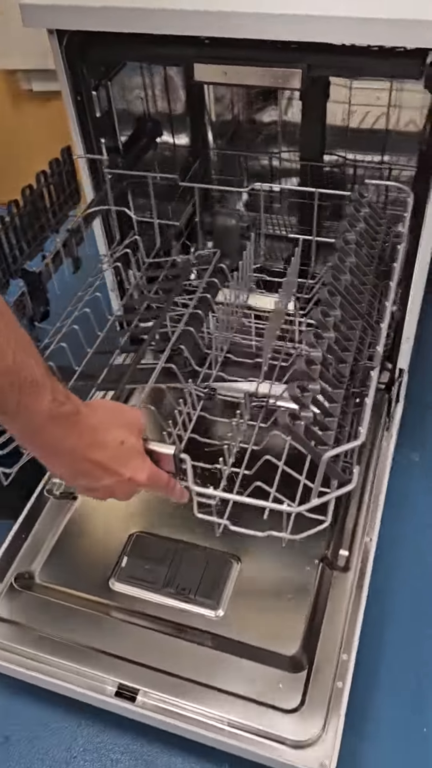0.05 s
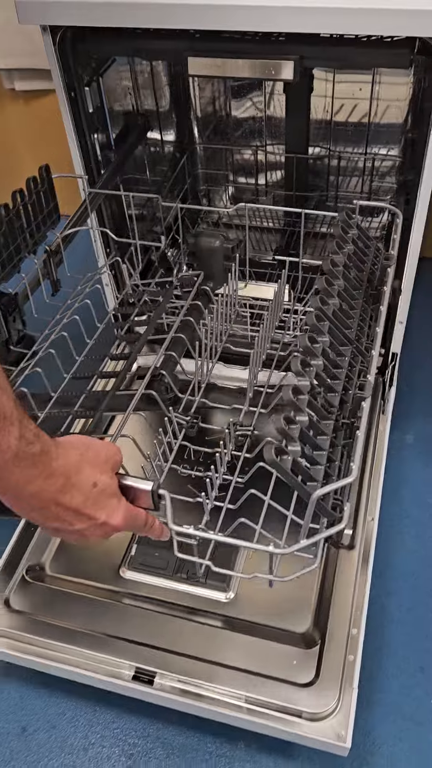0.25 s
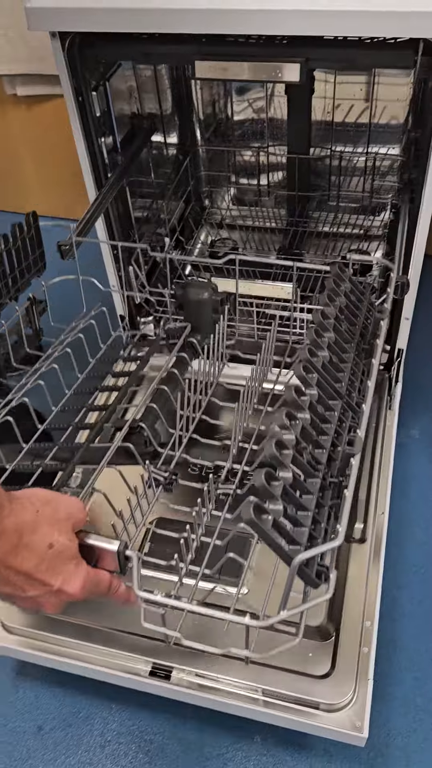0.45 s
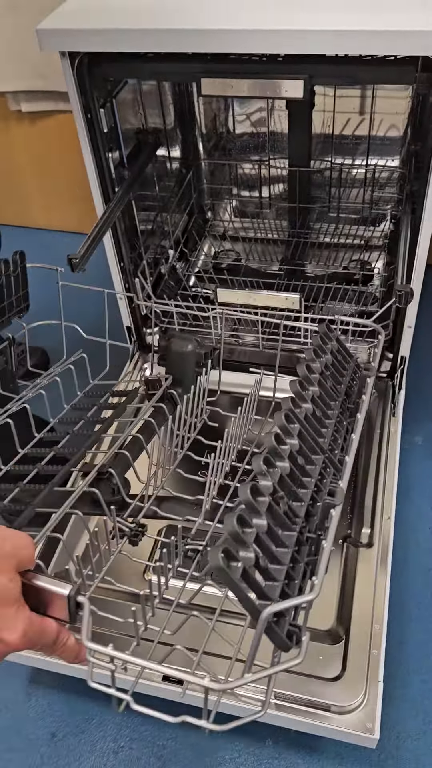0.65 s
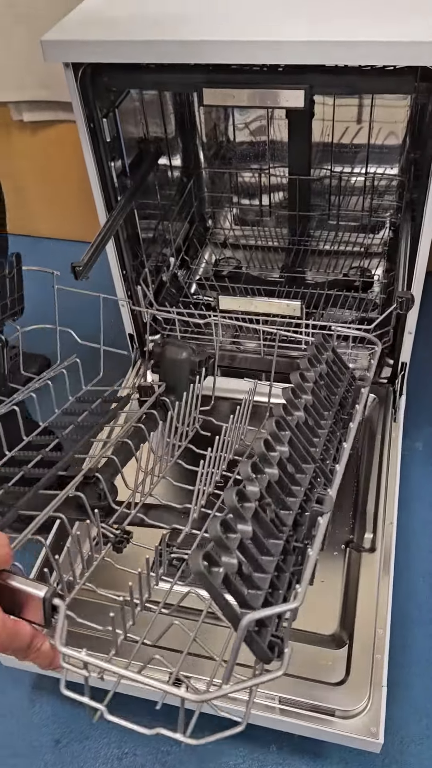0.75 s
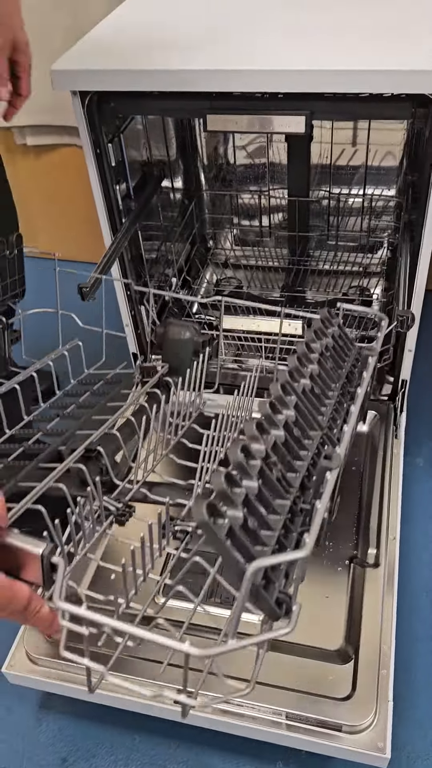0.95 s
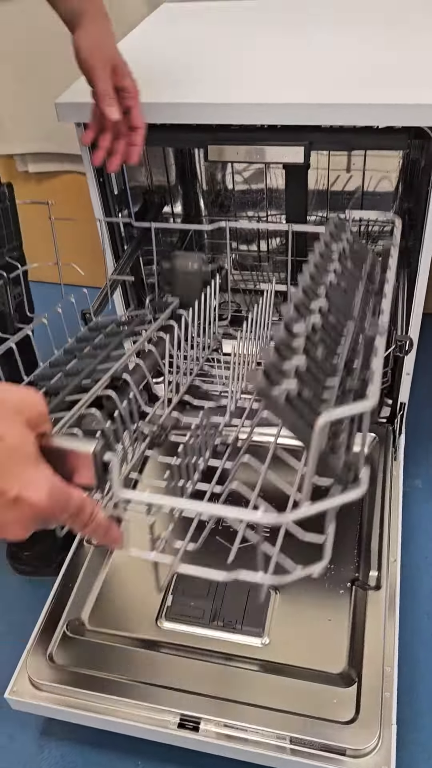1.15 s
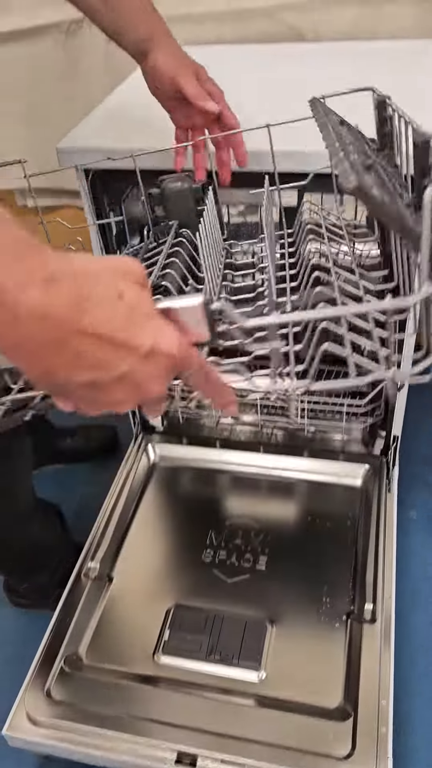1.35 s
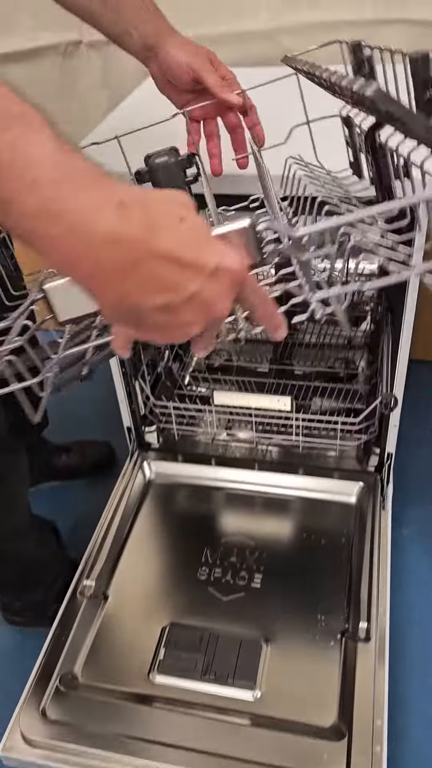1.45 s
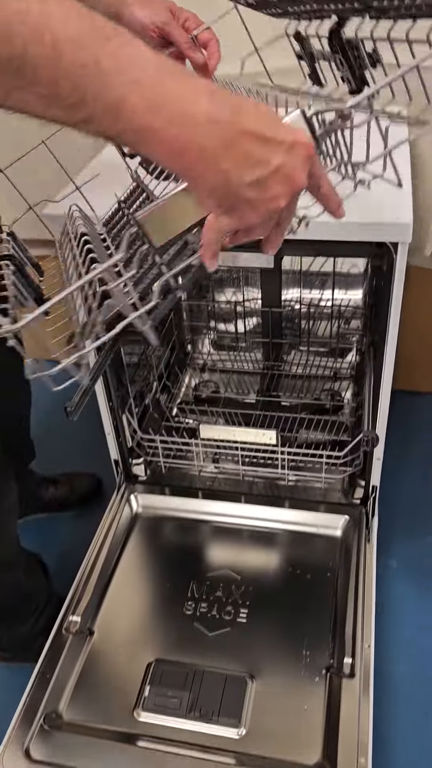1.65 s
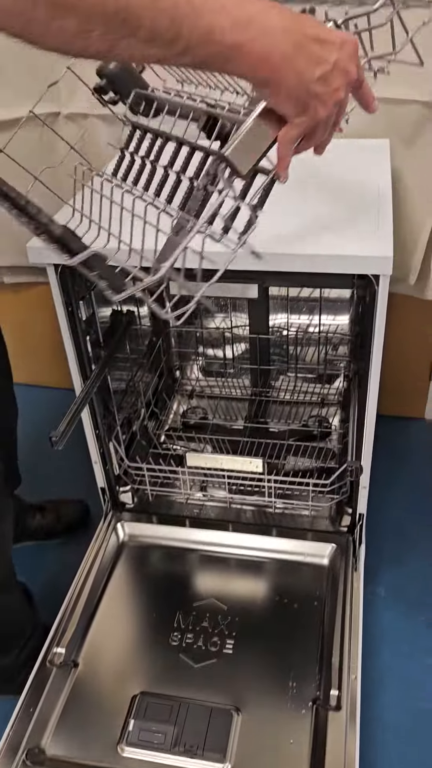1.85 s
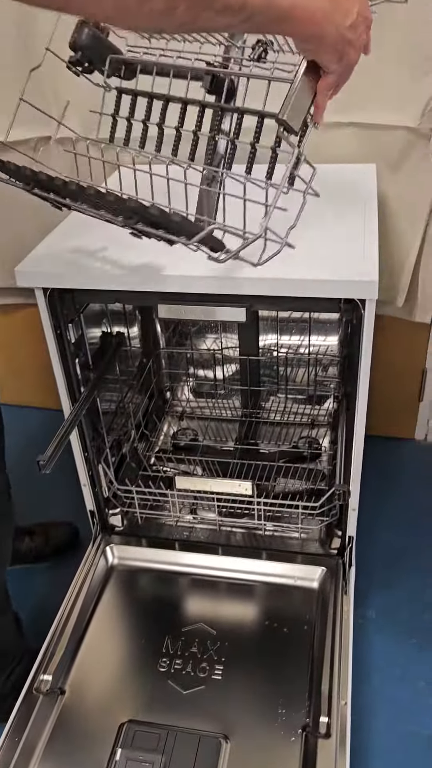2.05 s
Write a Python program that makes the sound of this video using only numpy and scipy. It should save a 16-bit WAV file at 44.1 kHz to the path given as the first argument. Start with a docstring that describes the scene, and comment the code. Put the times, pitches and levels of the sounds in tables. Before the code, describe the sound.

Metal dishwasher rack clattering at the end of its rails, then a snap and soft bump.

```python
"""A small, quiet room with low ventilation noise, a stereo microphone pair near a dishwasher.
The wire rack rolls out on its rails and crashes into the end stops, ringing its wires and the steel tub.
A catch snaps on the right; the rack scrapes off the rails and bumps the cabinet as it is lifted away.
It rubs lightly while carried, and a loose fitting ticks faintly, close to the right microphone."""
import sys
import numpy as np
from scipy import signal
from scipy.fft import rfft, irfft, next_fast_len
from scipy.io import wavfile

SR = 44100
rng = np.random.default_rng(int(sys.argv[2]) if len(sys.argv) > 2 else 0)


def put_to_file(sound):
    """Save the sound as 16-bit audio at rate SR, in the file named by the first command-line argument."""
    columns = np.atleast_2d(sound).T  # one column per channel
    safe = np.clip(columns, -1, 1)
    whole_steps = np.round(safe * 32767)
    wavfile.write(sys.argv[1], SR, whole_steps.astype(np.int16))


N = 92610
T = np.arange(N) / SR

# rack hitting the end stops: start_s, wire_db, tub_db, left_over_right_db
STOP_HITS = [(0.1892, -38, -46.5, -5), (0.1905, -25.5, -34.5, 0), (0.1962, -22.5, -32.5, -3.5),
             (0.203, -26.5, -34, -8), (0.2104, -15.5, -43.5, -3), (.2155, -23, -43.5, -3),
             (0.2207, -10.5, -41.5, 1.5), (.226, -12.5, -45.5, -3.5), (.2355, -15.5, -36, -3),
             (0.254, -41, -39, -3.5)]
# spectrum of the crowded wire modes: frequency_hz, level_db
CLASH_SPECTRUM = [(400, -18.5), (800, -21.5), (1600, -20), (2500, -13.5), (3200, -8.5), (4100, -2),
                  (5400, 0), (7300, -1), (9000, -9.5), (12000, -14), (15800, -19.5)]
# clear wire modes: pitch_hz, level_db
WIRE_MODES = [(2734, -31), (3130, -24), (3597, -25.5), (3766, -29), (4048, -22.5), (4141, -22),
              (4760, -25.5), (4936, -17), (5056, -19), (5194, -22.5), (5256, -14.5), (5441, -13.5),
              (5640, -26.5), (6072, -23.5), (6118, -25), (6534, -24), (6880, -26.5), (7060, -24.5),
              (7255, -16), (7804, -23.5), (9152, -25), (12300, -27)]
# steel tub modes: pitch_hz, level_db, t60_s
TUB_MODES = [(88, -15.5, .25), (127.8, -6.5, .35), (175.3, -16, .25), (244, -8, .25), (335, -13, 0.28),
             (392.5, -1.5, .15), (594.6, -4, 0.171), (670.3, -4, .15), (1298, -13.5, .15)]
# dull panel flex: frequency_hz, level_db
PANEL_SPECTRUM = [(25, -28.5), (70, -6.5), (150, -6), (400, -5.5), (800, -10.5), (1500, -13.5),
                  (4000, -44.5)]

# plastic catch and its rebounds: start_s, level_db
SNAP_HITS = [(0.753, -32), (.757, -41), (0.766, -49.5)]
# plastic snap: frequency_hz, level_db
SNAP_SPECTRUM = [(180, -18), (400, -5), (800, -19), (1200, 0.5), (2000, 3.5), (3000, 1.5), (4100, -6),
                 (5200, -6), (7500, -12), (10000, -22), (15800, -30)]
# rail modes: pitch_hz, level_db, t60_s
RAIL_MODES = [(252, -15.5, 0.2), (607, -23.5, 0.44), (786, -18.5, 0.32), (1144, -14.5, 0.15),
              (1556, -14.5, 0.16), (2146, -22, 0.24), (2256, -30, 0.1)]

# soft bumps on the cabinet: start_s, level_db
BUMP_HITS = [(1.2791, -35.5), (1.313, -46.5)]
# thud of a bump: frequency_hz, level_db
BUMP_SPECTRUM = [(25, -22), (65, 6), (140, -1), (220, 3.5), (380, -1.5), (600, -8), (900, -24), (1700, -39),
                 (2250, -24.5), (2800, -32), (3400, -42), (6000, -48), (12000, -67)]
# cabinet modes: pitch_hz, level_db, t60_s
CABINET_MODES = [(67.5, -4, 0.13), (127.85, -7.5, .18), (216.7, -16, 0.11), (334, -1.5, 0.14),
                 (558, -16.5, 0.24), (2240, -41, 0.057), (2750, -37, 0.079)]

# rack rolling out: time_s, rumble_db, rattle_db
ROLL_LEVELS = [(0, -41, -55.5), (.04, -58, -59), (.08, -53.5, -59), (.1, -58.5, -54), (.15, -52.5, -60.5),
               (.19, -56.5, -57.5), (.36, -60, -61.5), (.47, -69, -66), (.57, -63.5, -64.5),
               (.61, -91, -76.5), (.7, -79, -90)]
# wheel rumble: frequency_hz, level_db
RUMBLE_SPECTRUM = [(25, -31.5), (70, -17.5), (105, 2), (150, -11), (210, -4.5), (350, -15.5), (600, -20),
                   (1200, -38.5), (3000, -59)]
# shaken wires: frequency_hz, level_db
RATTLE_SPECTRUM = [(530, -44), (900, -9), (1210, -24.5), (1450, -8), (1960, -26), (2110, -15.5),
                   (3570, -9.5), (4280, -3), (7980, -13.5), (12900, -20), (15800, -29.5)]

# rack sliding off the rails: time_s, body_db, hiss_db
SLIDE_LEVELS = [(.69, -95.5, -100), (.715, -66.5, -78), (.745, -71.5, -84.5), (.775, -59.5, -69.5),
                (.81, -58.5, -64), (.84, -59, -68), (.87, -70.5, -78.5), (.93, -88, -87), (1, -110, -110)]
# body of the scrape: frequency_hz, level_db
SCRAPE_SPECTRUM = [(150, -13.5), (270, -1.5), (400, -5), (570, 2), (800, -4.5), (1000, -10.5), (1180, -6.5),
                   (1400, -13), (2100, -9), (3200, -10), (4200, -6), (5300, -11.5), (8000, -20),
                   (11000, -45.5)]
# hiss of the scrape: frequency_hz, level_db
HISS_SPECTRUM = [(4000, -23.5), (8000, -0.5), (12500, -0.5), (15800, -11.5)]

# loose fitting in the lifted rack: start_s, level_db
TICK_HITS = [(1.8315, -53)]
# tick of the fitting: frequency_hz, level_db
TICK_SPECTRUM = [(800, -20.5), (2000, -13), (3300, -34), (4300, -6), (5000, 0.5), (5700, -11), (7000, -8),
                 (9000, -31), (15000, -36.5)]
# light rubs of the rack: peak_s, half_width_s, level_db
RUB_STROKES = [(1.47, 0.018, -66.5), (2.047, .015, -82)]
# rubbing noise: frequency_hz, level_db
RUB_SPECTRUM = [(700, -22), (980, -3), (1090, 19), (1220, -13), (1500, -17), (3300, -11), (4500, 2),
                (6300, -10), (8400, 2), (10000, -23), (15000, -22.5)]

# ventilation and microphone hiss: frequency_hz, level_db
ROOM_TONE_SPECTRUM = [(15, -33.5), (25, -2), (110, -6), (144, 0), (205, -4), (248, -5), (333, -4),
                      (371, -11), (425, -13.5), (572, -14), (620, -18), (955, -22), (1870, -27.5),
                      (5820, -35), (8490, -29.5), (9720, -45), (15800, -44)]
# likeness of the sound at the two microphones: frequency_hz, correlation
MIC_CORRELATION = [(60, 0.89), (170, 1), (350, .72), (700, 0.5), (1400, -0.059), (3000, 0.16),
                   (6000, 0.083), (15000, .1)]
# decay of the room: frequency_hz, t60_s
ROOM_DECAY = [(100, 0.64), (300, 0.42), (700, 0.48), (2000, 0.34), (5000, .29), (13000, 0.27)]

LOW_CUT_HZ, TOP_HZ = 20, 16000


def rack_crash():
    """Each contact with the stops clashes the wires, leaves them chattering and knocks the tub."""
    hz = np.arange(110, TOP_HZ, 110)
    ripple_db = 3.5 * rng.standard_normal(len(hz))
    crowded_modes = np.column_stack([hz, along(CLASH_SPECTRUM, hz) + ripple_db])
    impacts = np.zeros((2, N))
    for start_s, wire_db, tub_db, side_db in STOP_HITS:
        strike = blow(start_s, t60_s=0.094, attack_s=0.0004)
        chatter = amp(-30) * blow(start_s, t60_s=0.43, attack_s=0.01)
        clash = noise(crowded_modes) * grains(per_s=2600, life_s=0.00071)
        impacts += amp(wire_db) * pan(side_db) * clash * (strike + chatter)
        impacts += amp(tub_db - 2) * noise(PANEL_SPECTRUM) * blow(start_s, t60_s=0.15, attack_s=0.00077)
    wire_hits, tub_hits = [(s, db) for s, db, _, _ in STOP_HITS], [(s, db) for s, _, db, _ in STOP_HITS]
    wire_t60_s = 0.11
    wires = ring([(pitch_hz, db, wire_t60_s) for pitch_hz, db in WIRE_MODES], wire_hits, width_hz=10)
    tub = ring(TUB_MODES, tub_hits, width_hz=6)
    return impacts + pan(-1.5) * wires + tub


def catch_snap():
    """Right of centre, a dry plastic snap with smaller rebounds echoes in the tub and rings the rail."""
    snaps = np.zeros((2, N))
    for start_s, db in SNAP_HITS:
        snap = direct(SNAP_SPECTRUM, lag_s=0.00009) * blow(start_s, t60_s=0.00693, attack_s=0.000197)
        tub_echo = noise(SNAP_SPECTRUM) * blow(start_s, t60_s=0.1045, attack_s=0.0013)
        snaps += amp(db) * (pan(-6.5) * snap + amp(-12.5) * tub_echo)
    return snaps + amp(-9.5) * ring(RAIL_MODES, SNAP_HITS, width_hz=8.4)


def cabinet_bumps():
    """At centre, the lifted rack thuds softly against the cabinet and sets it ringing."""
    bumps = ring(CABINET_MODES, BUMP_HITS, width_hz=17.6)
    for start_s, db in BUMP_HITS:
        bumps += amp(db) * noise(BUMP_SPECTRUM) * blow(start_s, t60_s=0.11, attack_s=0.00078)
    return bumps


def rolling_wheels():
    """Wheels rumble along the rails and shake the wires, a little to the right."""
    rumble_gain, rattle_gain = gains(ROLL_LEVELS)
    rumble = noise(RUMBLE_SPECTRUM)
    rattle = noise(RATTLE_SPECTRUM) * grains(per_s=2200, life_s=0.0027)
    return rumble_gain * rumble + rattle_gain * pan(-2.5) * rattle


def rail_scrape():
    """The wheels scrape out of the rail ends."""
    body_gain, hiss_gain = gains(SLIDE_LEVELS)
    friction = body_gain * noise(SCRAPE_SPECTRUM) + hiss_gain * noise(HISS_SPECTRUM)
    return friction * grains(per_s=4800, life_s=0.002)


def fitting_tick():
    """A loose fitting ticks close to the right microphone, too near for the room to answer."""
    envelope = sum(amp(db) * blow(start_s, t60_s=0.01327, attack_s=0.00031) for start_s, db in TICK_HITS)
    return pan(-16.5) * direct(TICK_SPECTRUM, lag_s=0.00032) * envelope


def rack_rubs():
    """The carried rack rubs lightly, in brief swells of grainy friction."""
    rubs = sum(amp(db) * noise(RUB_SPECTRUM) * np.exp(-((T - peak_s) / half_width_s) ** 2)
               for peak_s, half_width_s, db in RUB_STROKES)
    return rubs * grains(per_s=650, life_s=0.002)


def room_tone():
    """Steady, low ventilation noise all around, with microphone hiss."""
    return amp(-63.5) * noise(ROOM_TONE_SPECTRUM)


def room(sound, wet_db):
    """Add the room's answer, each frequency dying at its own speed."""
    white = noise([(20, 0), (20000, 0)])[:, :SR // 2]
    hz, t, bands = signal.stft(white, SR, nperseg=256)
    decay = np.exp(-np.log(1000) * t / along(ROOM_DECAY, hz)[:, None])
    build_up = 1 - np.exp(-t / 0.0073)
    _, tail = signal.istft(bands * decay * build_up, SR, nperseg=256)
    tail /= np.linalg.norm(tail[0])
    return sound + amp(wet_db) * signal.fftconvolve(sound, tail, axes=1)[:, :N]


def ring(modes, hits, width_hz):
    """Hits add energy to the modes; phases drift, the higher modes differently at each microphone."""
    ringing = np.zeros((2, N))
    smoothing = signal.butter(2, 92, fs=SR)  # the pitch wavers mostly slower than 92 Hz
    for hz, db, t60_s in modes:
        energy = sum((amp(hit_db) * blow(s, t60_s, attack_s=0.0015)) ** 2 for s, hit_db in hits)
        waver = signal.lfilter(*smoothing, rng.standard_normal((2, N)))
        shared_drift, side_drift = np.cumsum(waver, axis=1) * np.sqrt(2 * np.pi * width_hz / SR)
        spread = stereo_angle(hz) * np.sin(side_drift) / np.sqrt(2)
        phase = 2 * np.pi * hz * T + shared_drift + np.array([spread, -spread])
        ringing += amp(db) * np.sqrt(energy) * np.sin(phase)
    return ringing


def blow(start_s, t60_s, attack_s):
    """Envelope of a hit: a quick rise, then an exponential decay."""
    age_s = np.maximum(T - start_s, 0)
    return (1 - np.exp(-age_s / attack_s)) * np.exp(-np.log(1000) * age_s / t60_s)


def grains(per_s, life_s):
    """A rough envelope of many tiny contacts."""
    contacts = (rng.random(N) < per_s / SR) * rng.exponential(size=N)
    energy = signal.lfilter([1], [1, -np.exp(-1 / (life_s * SR))], contacts)
    return unit_rms(np.sqrt(energy))


def noise(spectrum):
    """Noise of rms 1, alike at both microphones in the bass and diffuse in the treble."""
    hz = np.fft.rfftfreq(N, 1 / SR)
    angle = stereo_angle(hz) / 2
    coloured = rfft(rng.standard_normal((2, N))) * amp(along(spectrum, hz))
    mid, side = irfft(coloured * [np.cos(angle), np.sin(angle)], N)
    return unit_rms(np.array([mid + side, mid - side]))


def direct(spectrum, lag_s):
    """One noise that reaches the left microphone a little late."""
    right = noise(spectrum)[0]
    return np.array([np.roll(right, round(lag_s * SR)), right])


def stereo_angle(hz):
    """Angle in radians that grows as the two microphones hear less alike."""
    return np.arccos(np.clip(along(MIC_CORRELATION, hz), -1, 1))


def pan(left_over_right_db):
    """Gains at the two microphones; negative leans right."""
    return amp([[left_over_right_db / 2], [-left_over_right_db / 2]])


def gains(rows):
    """One gain per sample for each dB column after the time."""
    time_s, *columns = np.transpose(rows)
    return [amp(np.interp(T, time_s, db)) for db in columns]


def along(points, hz):
    """Read (frequency_hz, value) points on a log frequency axis."""
    point_hz, values = np.transpose(points)
    return np.interp(np.log(hz + 1), np.log(point_hz + 1), values)


def amp(db):
    """Decibels to gain."""
    return 10 ** (np.asarray(db) / 20)


def unit_rms(x):
    """Scale to rms 1."""
    return x / np.sqrt(np.mean(x ** 2) + 1e-20)


def scene():
    """The rack in the small room, one dry tick up close, and room tone behind."""
    handling = rolling_wheels() + catch_snap() + rail_scrape() + cabinet_bumps() + rack_rubs()
    return room(rack_crash(), wet_db=-13) + room(handling, wet_db=-13) + fitting_tick() + room_tone()


def record(dry):
    """The recorder thins the lowest bass and keeps nothing above its band limit."""
    padded = next_fast_len(N + SR // 2)
    hz = np.fft.rfftfreq(padded, 1 / SR)
    low_cut = hz ** 2 / (hz ** 2 + LOW_CUT_HZ ** 2)
    return irfft(rfft(dry, padded) * low_cut * (hz < TOP_HZ), padded)[:, :N]


dry = scene()
out = record(dry)
put_to_file(out)
```